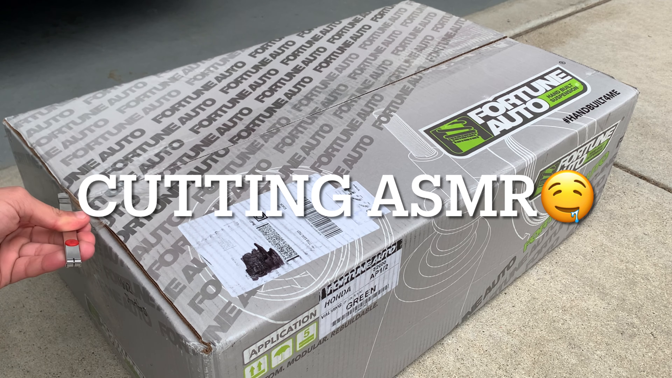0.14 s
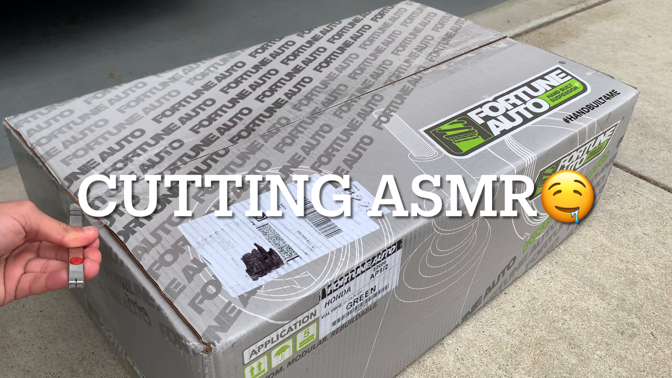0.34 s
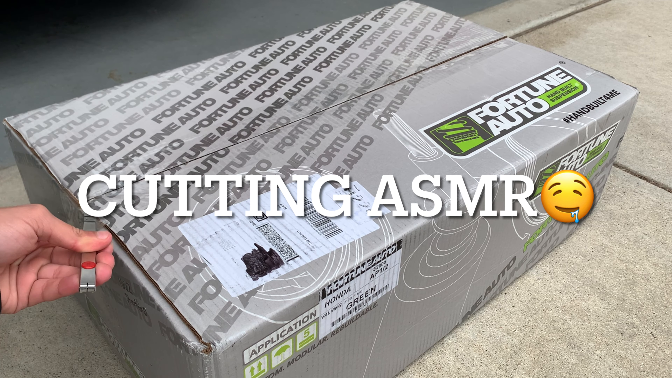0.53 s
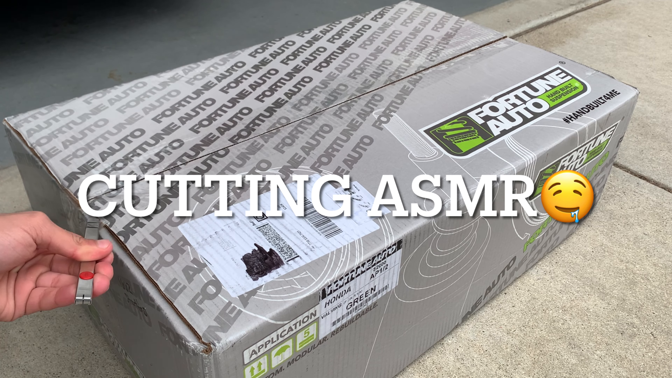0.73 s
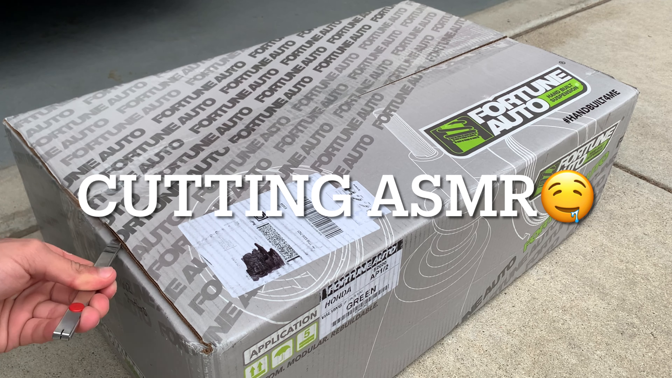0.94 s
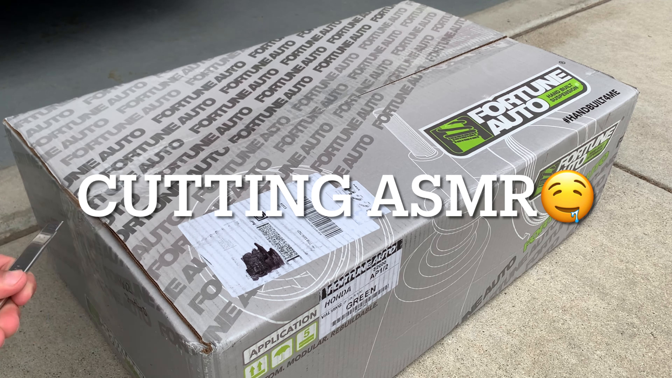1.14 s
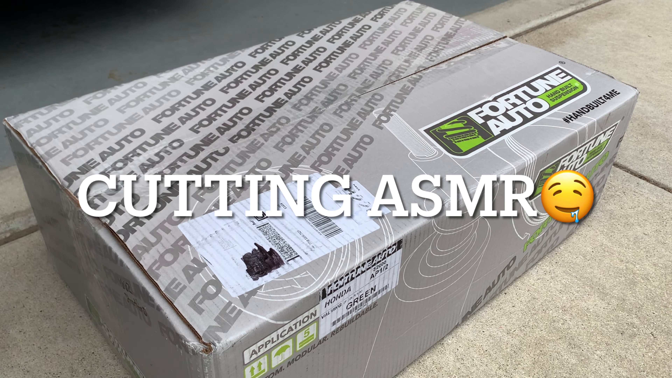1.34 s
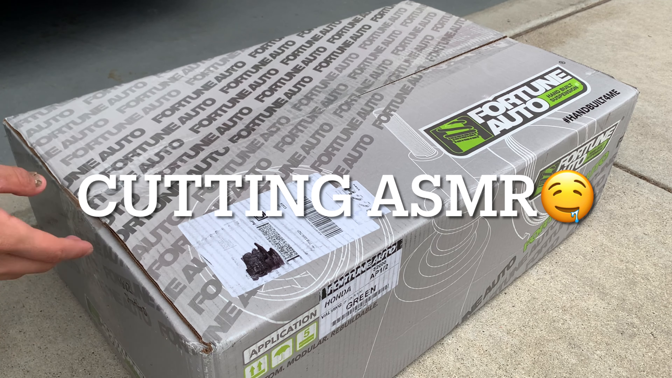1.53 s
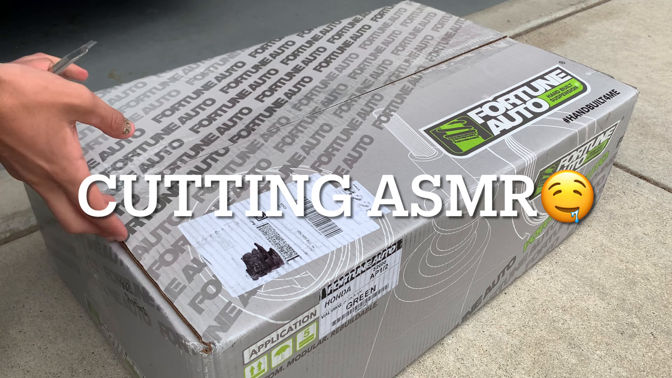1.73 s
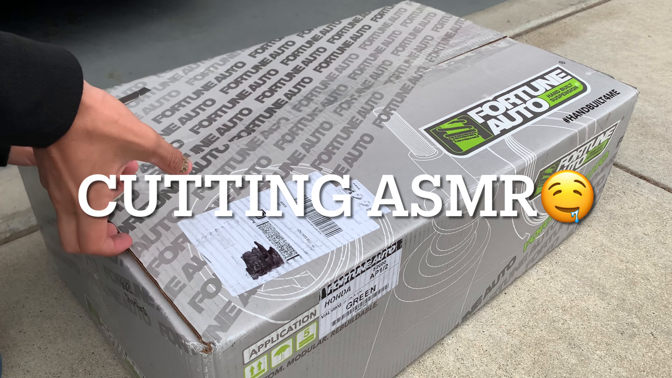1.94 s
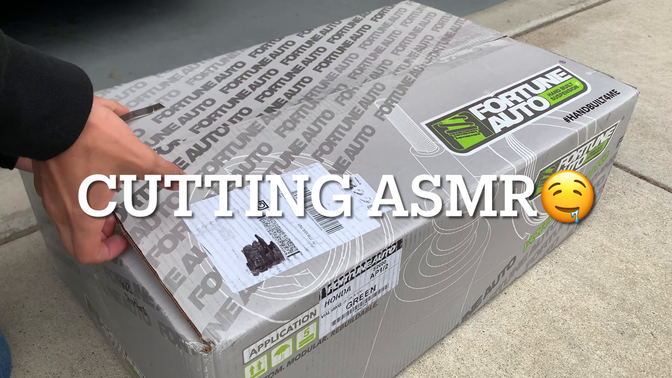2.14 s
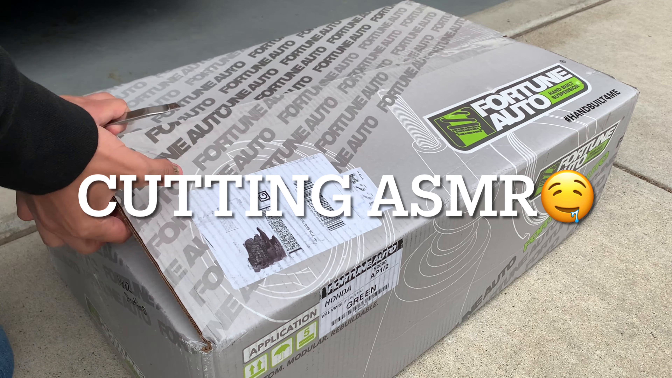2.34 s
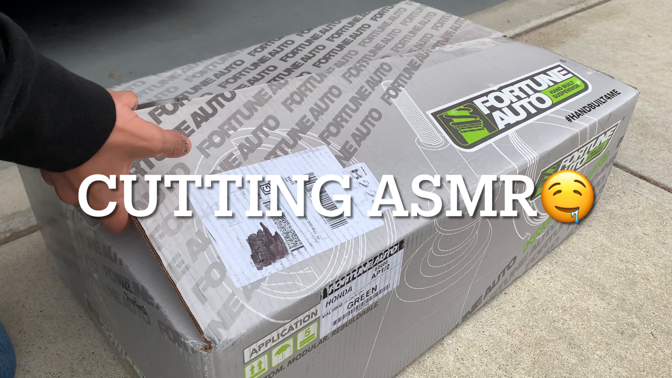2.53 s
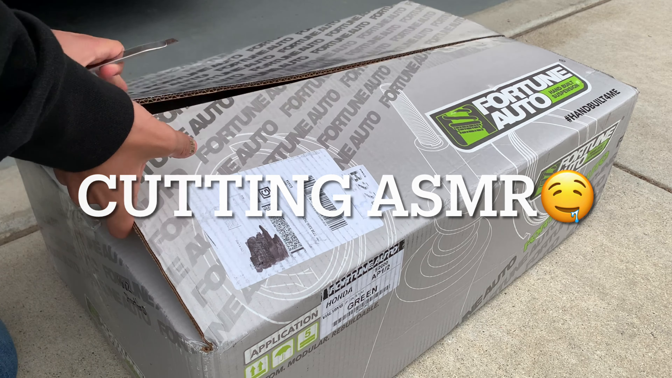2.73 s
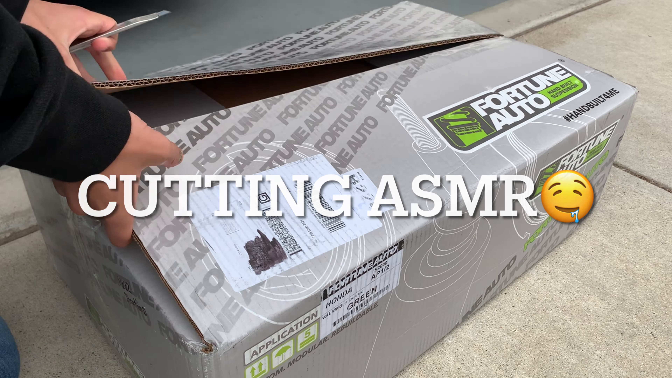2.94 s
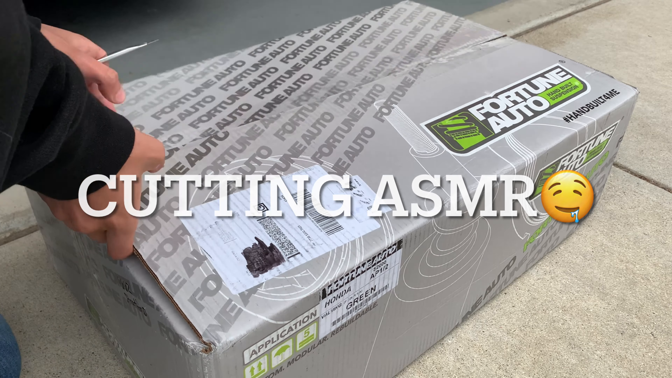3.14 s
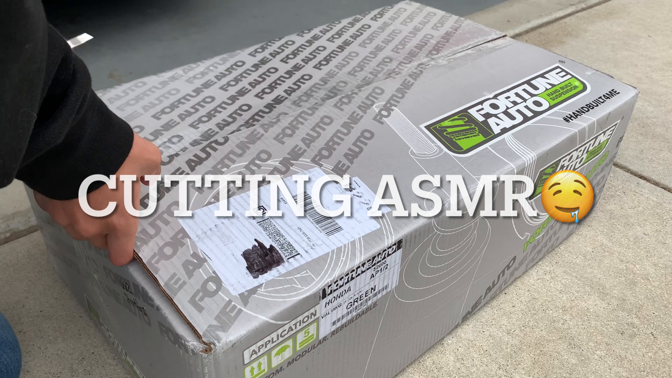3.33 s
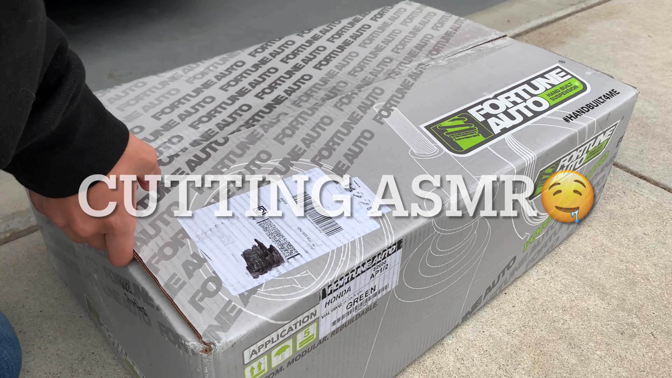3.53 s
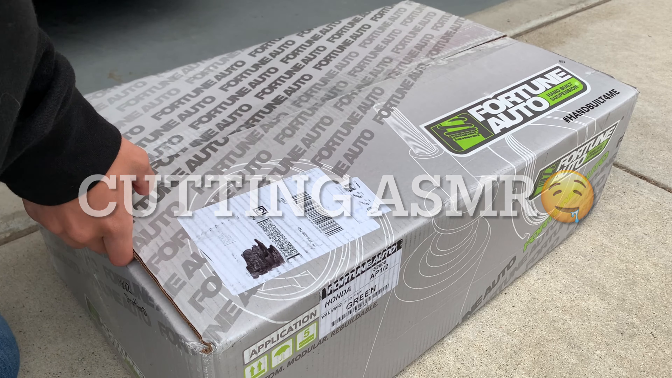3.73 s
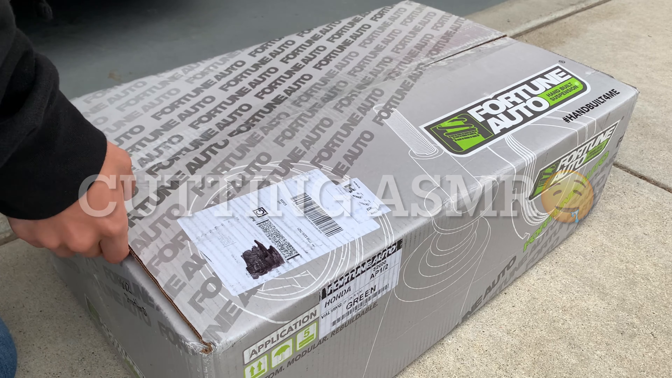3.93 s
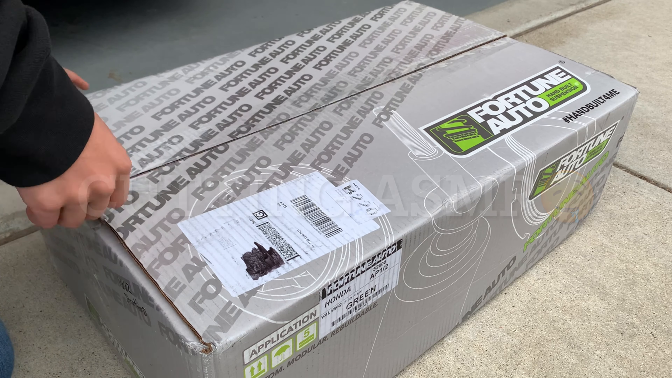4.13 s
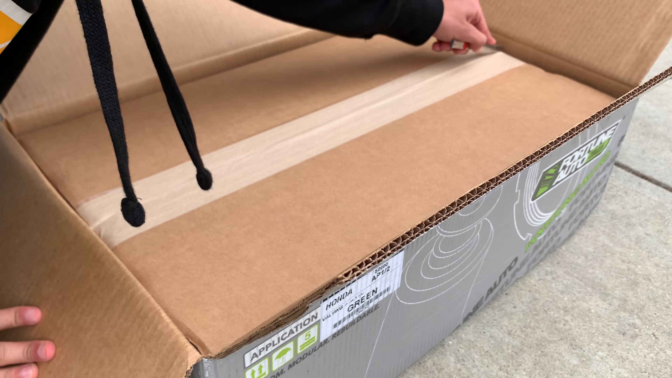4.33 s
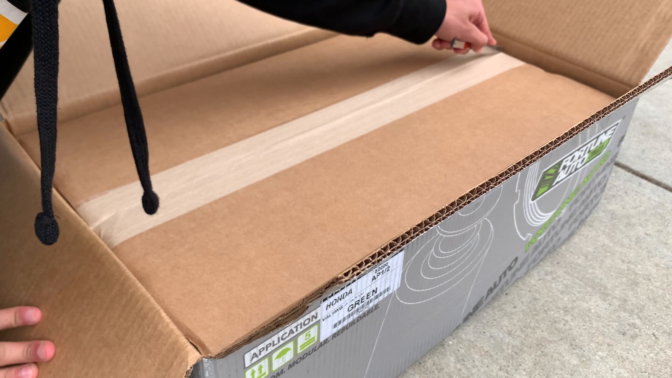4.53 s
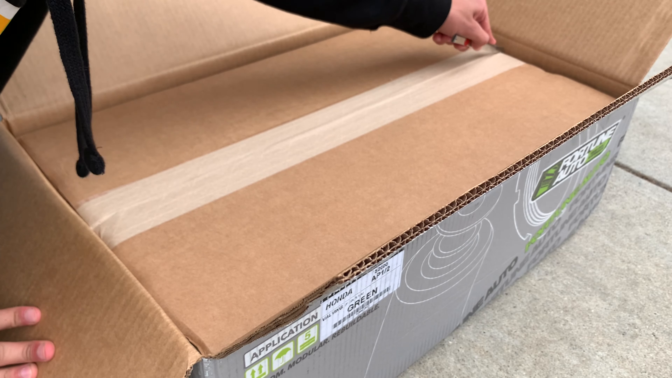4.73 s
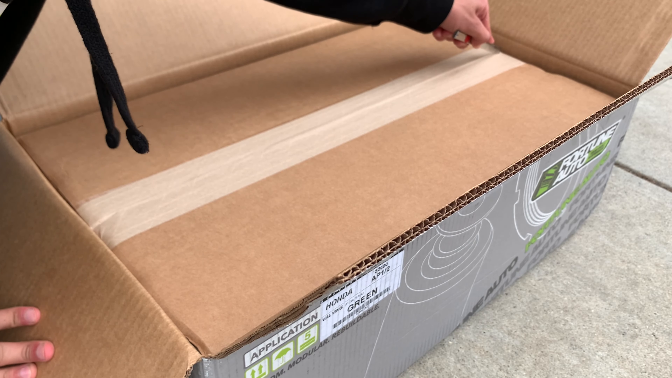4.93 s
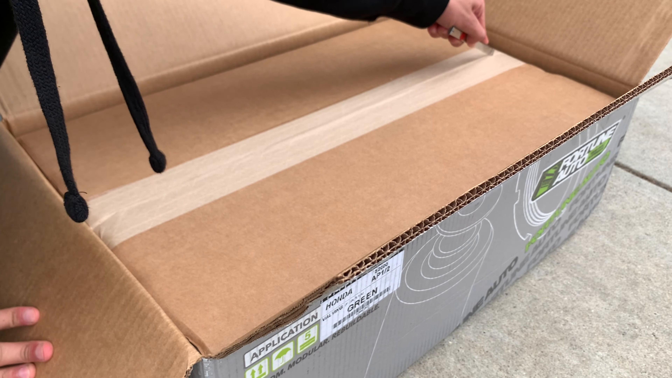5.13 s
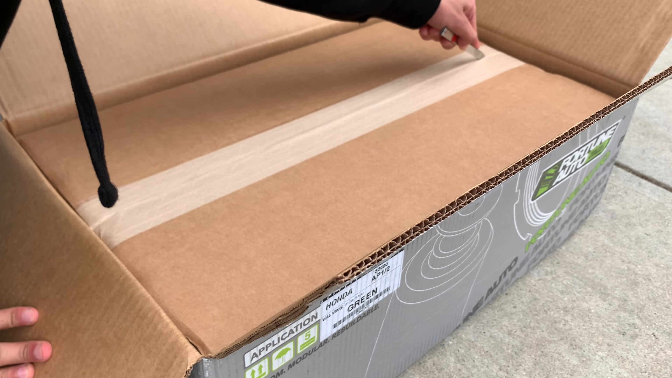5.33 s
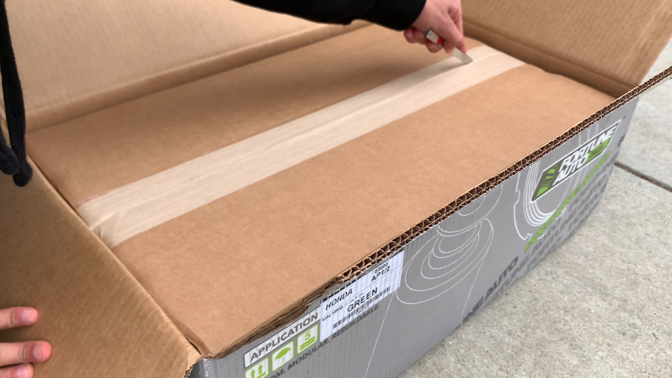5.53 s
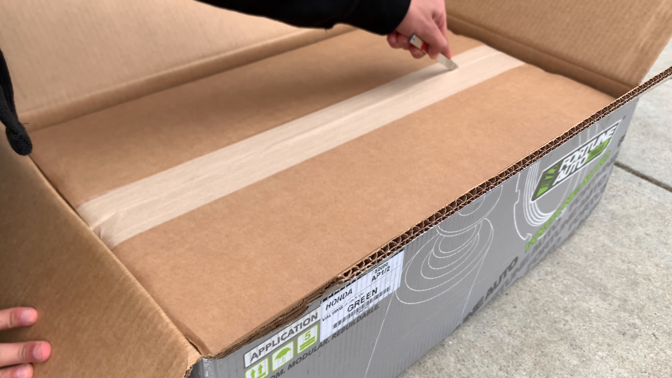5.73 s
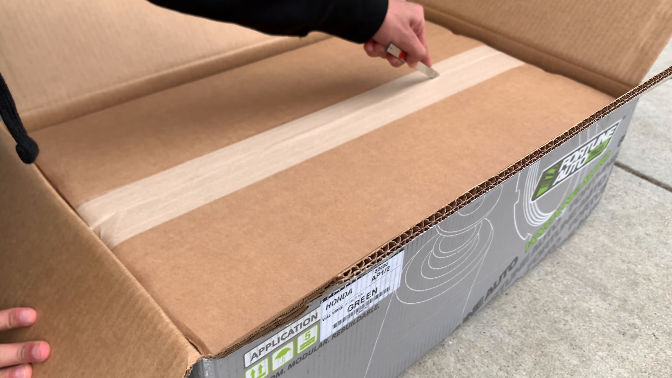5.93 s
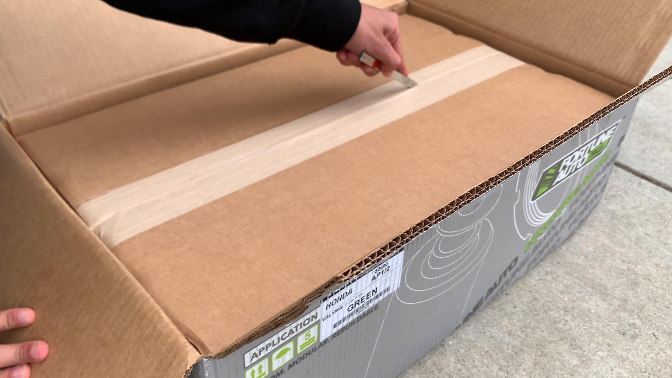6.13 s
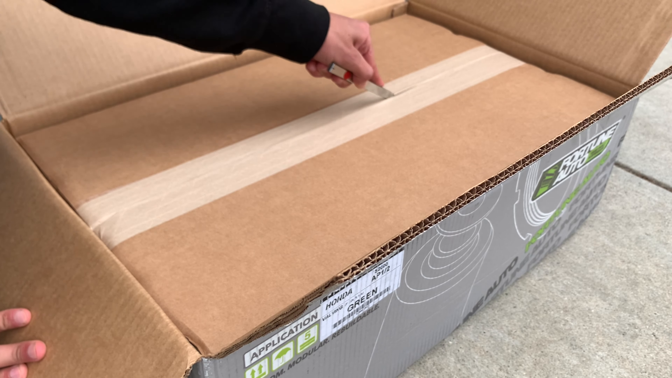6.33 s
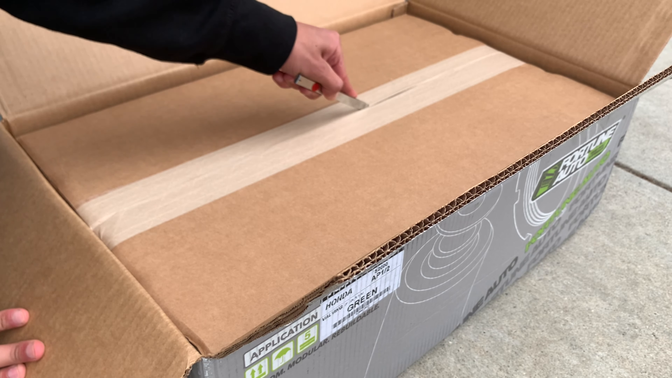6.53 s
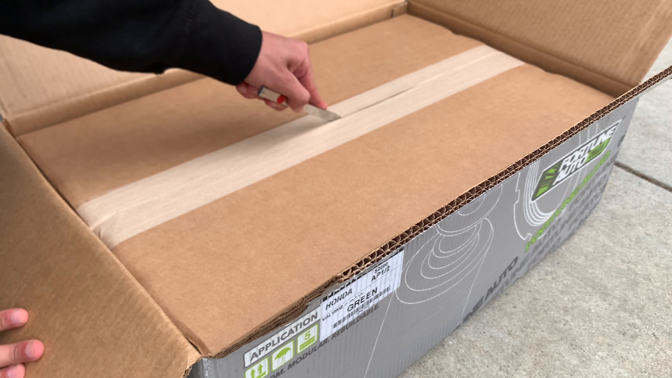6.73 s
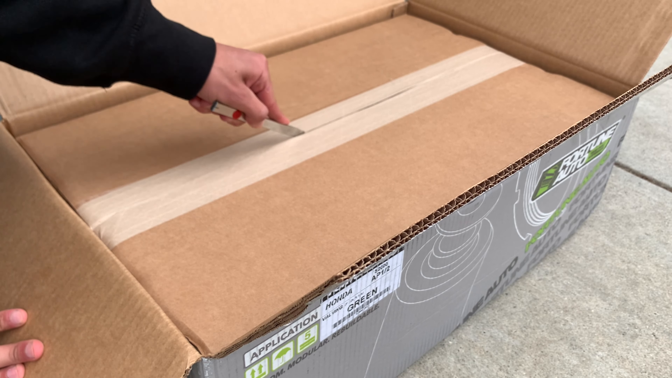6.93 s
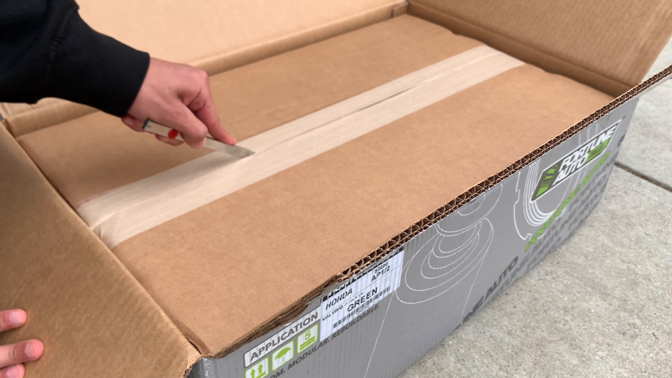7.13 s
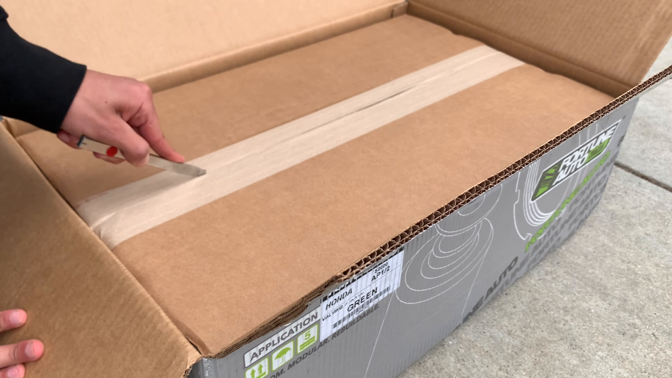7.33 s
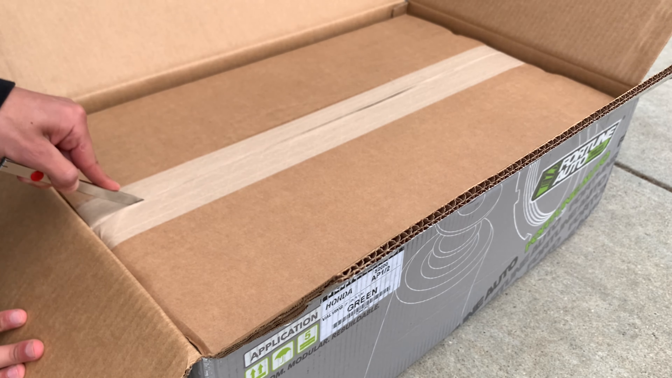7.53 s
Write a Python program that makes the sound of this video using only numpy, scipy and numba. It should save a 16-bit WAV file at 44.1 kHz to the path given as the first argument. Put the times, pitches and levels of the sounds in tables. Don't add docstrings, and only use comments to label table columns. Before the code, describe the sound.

A close, dry stereo pickup outdoors, with low distant traffic throughout. From 0.25 to 1.1 seconds a blade nicks the tape of a cardboard box: short hissy scrapes, bright clicks and dull knocks, strongest near 0.86. Quieter rubs and small crackles follow until 2. At 2.16 the tape snaps hard with a hollow knock; a flap bends with a falling chirp near 2.25, another heavy snap and scrape land at 2.48, then board crackles until 2.9. A sharp crack and deep thump hit at 3.1. After near quiet, a palm hisses over the lid from 3.87 to 4.3, growing duller. The sound dips at 4.34 as the scene changes. From 4.75 a blade slits inner tape, faint and raspy at first, with boxy bumps at 5.2, 6.12 and 6.24. It strengthens after 7, with a big drumlike thud at 7.09, shifting left, ending in rapid ticks around 7.6.

```python
import sys
import numpy as np
from scipy import signal
from scipy.fft import rfft, irfft, next_fast_len
from scipy.io import wavfile
from scipy.ndimage import uniform_filter1d, map_coordinates
from numba import njit

SR = 44100
rng = np.random.default_rng(int(sys.argv[2]) if len(sys.argv) > 2 else 0)


def ratio_of_db(decibels):
    return 10 ** (np.asarray(decibels, float) / 20)


def transcribe(u):
    v = np.clip(np.atleast_2d(u).T, -1, 1)
    q = np.round(v * 32767).astype(np.int16)
    wavfile.write(sys.argv[1], SR, q)


N = 338235
T = np.arange(N) / SR
F = np.fft.rfftfreq(next_fast_len(N), 1 / SR)


def unit(x):
    return x / np.sqrt(np.mean(x ** 2))


def shape(points):
    hz, db = np.transpose(points)
    return ratio_of_db(np.interp(np.log(F + 1), np.log(hz), db))


def colour(x, gain):
    return irfft(rfft(x, next_fast_len(N)) * gain, next_fast_len(N))[..., :N]


def peak(hz, width):
    return 1 / (1 + 1j * (F - hz ** 2 / (F + 1)) / width)


def walk(rate):
    k = int(SR / rate)
    held = np.repeat(rng.standard_normal(N // k + 1), k)
    return 2.07 * uniform_filter1d(uniform_filter1d(held, k), k)[:N]


def slips(rate, spread_db, bed, patchy_db):
    chance = rng.random((3, N))
    size = ratio_of_db(-spread_db * np.log(chance[1] + .03))
    clicks = (chance[0] < rate / SR) * size * np.sign(chance[2] - .5)
    return (unit(clicks) + bed * rng.standard_normal(N)) * ratio_of_db(patchy_db * walk(45))


@njit
def svf(x, hz, share):
    y, b, l = np.empty(len(x)), 0., 0.
    for i in range(len(x)):
        g = np.tan(np.pi * hz[i] / SR)
        v = (b + g * (x[i] - l)) / (1 + g * (g + share))
        b, l, y[i] = 2 * v - b, l + 2 * g * v, share * v
    return y


def twice(x, hz, share):
    return svf(svf(x, hz, share), hz, share)


def add(out, s, x):
    i = int(s * SR)
    out[i:i + len(x)] += x[:N - i]


def curve(rows):
    s, *columns = np.transpose(rows)
    return [np.interp(T, s, c) for c in columns]


# frequency in Hz, density in dB per Hz.
TRAFFIC = [(15, -54), (25, -21), (43, -12.5), (64, -5), (92, -11), (127, -3), (212, -18), (249, -20),
           (373, -23), (840, -23), (1520, -36), (2280, -48), (2610, -47.5), (14800, -58), (16000, -69)]
# frequency in Hz, likeness from 0 to 1.
ALIKE = [(60, 1), (200, 0.85), (500, 0.08), (1000, 0.068), (16000, 0.08)]


def traffic():
    hz, likeness = np.transpose(ALIKE)
    alike = np.interp(np.log(F + 1), np.log(hz), likeness)
    mid, side = rng.standard_normal((2, N))
    common, unlike = colour(mid, np.sqrt(1 + alike)), colour(side, np.sqrt(1 - alike))
    both = np.array([common + unlike, common - unlike])
    low = colour(both, shape(TRAFFIC) * (F < 300))
    high = colour(both, shape(TRAFFIC) * (F >= 300))
    swelling = low * ratio_of_db(1.2 * walk(7.4)) + high * ratio_of_db(0.17 * walk(4.1))
    return ratio_of_db(-52.5) * swelling / np.std(low + high)


def yard(x, t60, wet_db):
    t = T[:16384]
    scatter = rng.standard_normal((2, len(t))) * np.exp(-np.log(1000) * t / t60) * (t > .0012)
    scatter = irfft(np.exp(1j * np.angle(rfft(scatter))))
    scatter = scatter * np.clip(1 - t / t60, 0, 1)
    echoes = signal.fftconvolve(x[None], unit(scatter) / np.sqrt(len(t)), axes=1)[:, :N]
    return ratio_of_db(wet_db) * colour(echoes, F / (F + 250) / (1 + (F / 9100) ** 4))


def shifted(echoes):
    shift_s, shifts_per_s = 0.00015435, 5
    dull = colour(echoes, 1 / (1 + (F / 6500) ** 4))
    times = [np.arange(N) - shift_s * SR * walk(shifts_per_s) for _ in dull]
    return np.array([map_coordinates(side, [when], mode="mirror") for side, when in zip(dull, times)])


# frequency in Hz, gain in dB.
FIBRE = [(2000, 2), (3200, 1.5), (5000, 3), (7500, 3), (10000, 4), (13000, -0.5), (15600, -3),
         (17000, -54.5)]
# start in seconds, length in seconds, level in dB, first and last centre in Hz.
SLIDES = [
    (3.867, 0.15, -44, 8000, 4660),
    (4.023, 0.048, -55.5, 6400, 5940),
    (4.045, 0.261, -43, 6900, 2120),
]


def slides():
    hz, gain = np.full(N, 5000.), np.zeros(N)
    loudest, sag_db, width = 0.2, -32.5, 2.5
    for s, length, db, first_hz, last_hz in SLIDES:
        u = (T - s) / length
        on = (u >= 0) & (u < 1)
        hz[on] = first_hz * (last_hz / first_hz) ** u[on]
        rise = np.clip(0.088 + u / loudest, 0, 1)
        sag = ratio_of_db(sag_db * np.clip(u - loudest, 0, 1) * hz / 6000)
        gain += ratio_of_db(db) * rise * sag * on
    rub = colour(slips(6000, 1.5, 1.5, .9), shape(FIBRE))
    rub = rub + 0.82 * colour(rub, peak(4250, 1100))
    return uniform_filter1d(gain, 200) * unit(twice(rub, hz, width))


# start in seconds, length in seconds, hiss in dB,
# scrape in dB, change over the stroke in dB.
STROKES = [(0.249, 0.16, -53.5, -56, 12.5), (0.424, 0.023, -42.5, -41.5, 9.5), (0.603, 0.33, -57, -64, 15),
           (0.83, 0.071, -33.5, -44.5, 4), (0.942, 0.054, -53.5, -68, 6.5), (1.001, 0.034, -60, -42, -13.5),
           (1.365, 0.01, -70, -80, -13.5), (1.455, 0.043, -67, -67, 7.5), (1.384, 0.047, -63, -60, -7.5),
           (4.37, 0.039, -74.5, -81.5, -2), (1.606, 0.067, -69, -49, -11.5), (1.70, 0.2, -85, -62.5, -9),
           (1.906, 0.24, -62.5, -68.5, -4.5), (2.162, 0.073, -49, -34, -26.5),
           (2.259, 0.26, -50, -52, -31.5), (2.43, 0.042, -54, -73, 4), (2.479, 0.028, -42, -16.5, -27),
           (2.521, 0.26, -64, -53, -14), (2.724, 0.15, -64, -51.5, -4), (2.968, 0.16, -59, -59, 6),
           (3.097, 0.072, -50, -32.5, -29.5), (3.289, 0.039, -84, -55, -11.5),
           (3.703, 0.182, -73, -87.5, -6.5), (0.537, 0.127, -63, -88.5, 0.5), (0.792, 0.13, -66, -64.5, 3)]


def strokes():
    out, t = np.zeros((2, N)), T[:22050]
    attack_s, release_db_per_s = 0.02, 557.5
    for s, length, hiss_db, scrape_db, change_db in STROKES:
        db = change_db * np.clip(t / length, 0, 1) - release_db_per_s * np.clip(t - length, 0, 1)
        for row, top_db in zip(out, (hiss_db, scrape_db)):
            add(row, s, ratio_of_db(top_db + db) * np.clip(t / attack_s, 0, 1))
    return out


# centre in Hz, width in Hz, gain in dB.
LID = [(2650, 260, 4), (4750, 400, -0.5), (7000, 700, -2.5)]
# frequency in Hz, gain in dB.
SCRAPE = [(250, -8.5), (420, 2.5), (800, 7), (1300, -1.5), (2200, -5.5), (2800, -4.5), (3400, -29.5)]


def handling():
    hiss_gain, scrape_gain = strokes()
    lid = 1 + sum(ratio_of_db(db) * peak(hz, width) for hz, width, db in LID)
    hiss = unit(colour(slips(3500, 13.0, 1.2, 0.87), shape(FIBRE) * lid))
    air = colour(hiss, 1 / (1 + (12300 / (F + 1)) ** 16))
    hiss = hiss - air / (1 + hiss_gain / ratio_of_db(-55))
    scrape = unit(colour(slips(900, 4.1, 0.74, 5.4), shape(SCRAPE)))
    panel = unit(colour(slips(250, 0.83, 1.0, 0.82), peak(71, 39) + 0.19 * peak(170, 63)))
    grip = ratio_of_db(-68) * (T > 0) * (T < 6.3)
    load = uniform_filter1d(grip + ratio_of_db(1.5) * scrape_gain, int(0.062 * SR))
    return ratio_of_db(-3) * hiss_gain * hiss + ratio_of_db(-4) * scrape_gain * scrape + load * panel


# start in seconds, peak in dB.
FLEXES = [
    (2.252, -32),
    (2.283, -42),
]


def flexes():
    out, t = np.zeros(N), T[:4096]
    onset_hz, fall_s, length_s = 590, 0.0056, 0.057
    start_hz = onset_hz
    wave = np.sin(2 * np.pi * start_hz * fall_s * np.log(1 + t / fall_s))
    wave = wave * (1 - np.exp(-t / 0.0005)) * np.exp(-(t / length_s) ** 4)
    for s, db in FLEXES:
        add(out, s, ratio_of_db(db) * wave)
    return out


# multiple of the knock pitch, gain in dB.
PANEL = [(0.621, -3), (1.0, 4), (1.23, -4.5), (1.599, -4), (2.302, -8), (3.301, -6)]
# start in seconds, knock in dB, knock in Hz, thump in dB, thump in Hz.
OUTER = [(0.374, -34, 465, -30.5, 123), (0.44, -35, 318, -27.5, 138), (0.784, -33, 202, -32, 148),
         (.864, -23.5, 387, -27.5, 100), (0.887, -28.5, 229, -33, 70), (1.014, -35, 600, -35, 83),
         (1.61, -34, 272, -43.5, 140), (1.633, -38, 338, -40, 85.7), (2.027, -34.5, 200, -36, 89.4),
         (2.16, -21, 705, -34.5, 77), (2.166, -28.5, 537, -59, 120), (2.253, -37, 262, -53.5, 186),
         (2.286, -37.5, 700, -34.5, 100), (2.447, -38, 226, -26, 92), (2.478, -20.5, 790, -43.5, 117),
         (2.498, -21, 284, -26, 83), (2.741, -42.5, 560, -49, 141), (3.093, -24, 752, -34.5, 147),
         (3.109, -27, 353, -19.5, 69.4)]
# start in seconds, knock in dB, knock in Hz, thump in dB, thump in Hz.
INNER = [(4.755, -44.5, 248, -67, 57), (5.184, -35, 410, -32, 196), (5.205, -28, 503, -35, 130),
         (6.124, -21.5, 290, -24, 210), (6.214, -32.5, 372, -44, 145), (6.238, -19, 223, -21.5, 113),
         (6.547, -29, 191, -32, 81), (6.627, -25.5, 250, -27, 133), (6.778, -37, 255, -23.5, 108),
         (6.999, -30, 272, -53, 142), (7.086, -22, 564, -31, 130), (7.088, -40, 705, -11.5, 229.4),
         (7.388, -28, 187, -29, 85)]


def knocks():
    out, crunch, t = np.zeros(N), np.zeros(N), T[:16384]
    for s, db, hz, thump_db, thump_hz in OUTER + INNER:
        t60 = 0.055 * (300 / hz) ** 0.16
        fall = np.log(1000) / t60
        modes = np.zeros(len(t))
        for multiple, mode_db in PANEL:
            ring = np.sin(2 * np.pi * (multiple * hz * t + rng.random()))
            modes += ratio_of_db(mode_db) * ring * np.exp(-1.5 * np.sqrt(multiple) * fall * t)
        turns = thump_hz * (t + 0.21 * 0.017 * (1 - np.exp(-t / 0.0036)))
        thump_fall = .7 * np.log(1000) / 0.07 * (thump_hz / 100) ** 0.65
        thump = np.sin(2 * np.pi * turns) * np.exp(-thump_fall * t) * (1 - np.exp(-t / 0.005)) ** 2
        add(out, s, ratio_of_db(db - 2.5) * modes * (1 - np.exp(-t / 0.002)) + ratio_of_db(thump_db + 3.5) * thump)
        crush = rng.standard_normal(len(t)) * np.exp(-1.2 * fall * t) * (1 - np.exp(-t / 0.0014))
        add(crunch, s, ratio_of_db(db) * crush)
    return out + 0.32 * colour(crunch, shape(SCRAPE))


# start in seconds, peak in dB, pitch in Hz.
CRACKLES = [(.266, -49, 2090), (.376, -30.5, 1170), (.735, -49, 2500), (.745, -53, 2600), (.77, -48, 4700),
            (0.779, -41, 2500), (0.789, -48, 2600), (.86, -40, 2500), (.875, -38, 2580), (.89, -33, 977),
            (1.018, -42.5, 1000), (.805, -51, 3000), (.82, -50, 4520), (1.41, -59, 2800), (1.44, -55, 2560),
            (1.476, -58, 2900), (1.488, -50, 2680), (1.501, -49, 2750), (1.615, -45.5, 1170),
            (1.631, -46.5, 1540), (2.172, -36, 2200), (2.185, -38, 1490), (2.492, -44, 1910),
            (2.506, -35.5, 2500), (2.606, -53, 898), (2.615, -51, 1200), (2.653, -44, 1310),
            (2.710, -50, 900), (2.715, -42.5, 1500), (2.737, -46, 1100), (2.744, -40, 2600),
            (2.753, -46, 700), (2.761, -48, 950), (2.772, -42, 1300), (2.786, -45, 1100),
            (2.792, -44, 1300), (2.804, -46, 1090), (2.830, -38, 1240), (2.841, -54, 800),
            (2.851, -50, 1810), (2.871, -51, 700), (3.103, -30, 2400), (3.108, -23.5, 2660),
            (3.112, -33.5, 2060), (3.12, -43, 2470), (3.128, -45, 1800), (3.31, -51, 1200),
            (3.394, -56, 2000), (4.508, -60.5, 2400)]


def crackles():
    out, t = np.zeros(N), T[:1024]
    for s, db, hz in CRACKLES:
        puff = rng.standard_normal(len(t)) * np.exp(-t * hz / 3.8) * (1 - np.exp(-t * hz / 1.1))
        pop = twice(puff, hz + 0 * t, 0.52)
        add(out, s, ratio_of_db(db - 2.0) * pop / abs(pop).max())
    return out


# break in seconds, peak in dB, centre in Hz, dull part in dB.
NICKS = [(0.263, -47, 4420, 5), (.31, -41, 6300, -23), (0.325, -32.5, 4220, -8), (0.3731, -31, 4940, 10.5),
         (0.4318, -27, 7330, -3), (0.4503, -22, 7440, -9), (0.609, -42.5, 11400, -14),
         (0.732, -36, 6870, -16), (0.773, -33.5, 7000, -15), (0.852, -24, 11700, -20),
         (0.862, -16.5, 7800, -20), (0.966, -39, 8000, -6), (1.0155, -20.5, 6400, -15),
         (1.024, -32, 5140, 9), (1.0864, -48, 9850, -19), (1.3688, -35, 6600, -26),
         (1.485, -50.5, 10000, -2), (1.613, -40.5, 4500, -8), (1.622, -45.5, 10100, 3),
         (1.637, -46.5, 10500, -21.5), (1.936, -45, 10800, -15.5), (1.967, -42, 7500, -26),
         (2.027, -42, 3860, -6)]
# break in seconds, peak in dB, centre in Hz, dull part in dB.
PULLS = [(2.161, -34, 5400, -20), (2.2497, -31.5, 6100, -8), (2.283, -34, 4370, -14),
         (2.2978, -32, 6060, -8), (2.337, -41, 5130, -25), (2.399, -43.5, 9900, 2),
         (2.4482, -34.5, 7000, 7), (2.4792, -20.5, 3920, -1), (2.593, -42, 4970, 13),
         (2.744, -54, 4200, -1), (2.83, -45.5, 6100, 9), (2.888, -53, 11100, -13),
         (2.9817, -45.5, 6900, -13), (3.0923, -21, 5070, -15), (3.8715, -42, 4900, -30),
         (4.0608, -25, 5600, -44), (4.0681, -20.5, 6030, -49)]
# break in seconds, peak in dB, centre in Hz, dull part in dB.
THREADS = [(4.756, -38.5, 9850, 4.5), (4.778, -49, 3830, -1), (4.8524, -35.5, 4760, -12),
           (4.8738, -45.5, 4230, 5), (5.0186, -40.5, 4940, 6), (4.9747, -45, 5100, -4),
           (5.1156, -39, 4900, -7), (5.1712, -37, 6500, -13), (5.186, -30.5, 6400, 1),
           (5.2002, -26.5, 6300, 1), (5.208, -32, 6400, 0), (5.322, -49, 6500, -15),
           (5.385, -46, 6600, -15), (5.5016, -41, 6500, -10), (5.698, -34, 6500, -26),
           (6.1242, -24.5, 6000, 3), (6.179, -35, 6460, 5), (6.2107, -52, 4050, -5),
           (6.237, -23, 6350, -3.5), (6.552, -29, 10300, -29), (7.089, -22, 8500, 3.5),
           (7.366, -24.5, 3920, -8), (7.398, -21, 3840, -0.5), (7.405, -25, 10000, -20),
           (7.407, -32, 6000, -15)]
# break in seconds, peak in dB, centre in Hz, dull part in dB.
TICKS = [(0.855, -35, 4740, -10), (0.865, -14, 6990, -8), (0.958, -35, 7500, -3), (.3735, -34, 8900, -10),
         (1.910, -52, 4500, -18), (1.932, -47, 5000, -12), (1.98, -49, 7000, -20),
         (2.156, -12.5, 9500, -36), (2.162, -15, 5130, -28), (2.164, -19, 6200, -24),
         (2.4799, -17, 7000, -9), (4.117, -32, 6000, -25), (4.385, -57, 4500, -8),
         (6.963, -29.5, 11400, -15), (6.968, -36, 11200, -8), (7, -31, 11000, 0), (7.0154, -27, 10900, -23),
         (7.3244, -36, 4900, -15), (7.3876, -26, 6900, -26), (7.4455, -41, 6800, -15),
         (7.6035, -24, 7100, -18), (7.608, -22.5, 6300, 3), (7.619, -28, 6500, -25),
         (7.6239, -27, 10400, -27), (7.641, -22.5, 10700, -25), (7.6539, -23.5, 10500, -18)]
SNAP_MS = (6.4, 3.1, 6.2, 1.2)
SNAP_MS_PER_DB = (0.36, 0.44, 0.28, 0.016)


def snaps():
    lead_s = .012
    bright, dull, t = np.zeros(N), np.zeros(N), T[:2048] - lead_s
    for rows, base_ms, ms_per_db in zip((NICKS, PULLS, THREADS, TICKS), SNAP_MS, SNAP_MS_PER_DB):
        for s, db, hz, dull_db in rows:
            ms = base_ms + ms_per_db * (db + 42)
            fall = np.exp(-t / (max(ms, .2) * 1e-3 / 3))
            swell_in = 0.042 * np.exp(t / 0.0022) + np.exp(t / (0.00028 + 0.00005 * max(ms, 0)))
            burst = rng.standard_normal(len(t)) * np.where(t < 0, swell_in, fall) * np.sqrt(1.66 / base_ms)
            burst[int(lead_s * SR) + 1] += 1.0
            broad, tuned = svf(burst, hz + 0 * t, 2.2), svf(burst, hz + 0 * t, 0.38)
            add(bright, s - lead_s, ratio_of_db(db) * (0.68 * broad + 0.85 * tuned))
            add(dull, s - lead_s, ratio_of_db(db + dull_db) * burst)
    bright = colour(bright, shape(FIBRE) * F ** 2 / (F ** 2 + 1800 ** 2))
    return 0.99 * bright + 1.8 * colour(dull, peak(2400, 3000) ** 2)


GRAIN_HZ = (2500, 4200, 6500, 10500, 14500)


def flicker(x):
    parts = np.interp(np.log(F + 1), np.log(GRAIN_HZ), np.arange(len(GRAIN_HZ)))
    out = np.zeros(N)
    for k in range(len(GRAIN_HZ)):
        swell = ratio_of_db(.7 * (walk(10) + walk(35)))
        out += swell * colour(x, np.clip(1 - abs(parts - k), 0, 1))
    return out


# time in seconds, speed as hiss in dB, pressure as drum in dB,
# flap tension as drum in Hz.
SLIT = [(4.8, -68, -45.5, 179), (4.96, -61, -62, 197), (5.2, -63, -53.5, 228), (5.5, -60, -49.5, 225),
        (5.72, -57.5, -48.5, 293), (5.96, -53, -41, 322), (6.18, -54.5, -37.5, 324), (6.32, -54, -47, 221),
        (6.55, -53, -39, 216), (6.82, -52, -43.5, 210), (7.06, -52, -34, 237), (7.11, -44, -36, 237),
        (7.33, -49.5, -41, 236), (7.4, -44.5, -41.5, 268), (7.5, -42, -32, 274), (7.59, -45, -40.5, 293),
        (7.67, -60, -38.5, 356)]
# time in seconds, ring in Hz, ring in dB.
RING = [(4.8, 1700, -66), (5.05, 1750, -63), (5.3, 1760, -58), (5.55, 1810, -55), (6.02, 1715, -63),
        (6.2, 1880, -99), (6.75, 2920, -68), (7.0, 2630, -50.5), (7.3, 2710, -56), (7.42, 2700, -63),
        (7.67, 2650, -52)]
# time in seconds, pitch in Hz, scrape in dB.
SPAN = [(4.9, 445, -86), (5.02, 428, -55), (5.15, 445, -70), (5.3, 437, -55.5), (5.6, 450, -56.5),
        (5.8, 514, -58.5), (6.0, 590, -69), (6.17, 840, -41), (6.3, 780, -90), (6.55, 540, -52),
        (6.8, 740, -75), (7.05, 696, -47.5), (7.28, 714, -56), (7.4, 690, -44.5), (7.55, 500, -43.5),
        (7.67, 610, -60.5)]
# centre in Hz, width in Hz, gain in dB.
BLADE = [(2400, 490, 4), (4050, 1100, -1), (4780, 270, -2.5), (6510, 580, -4.5), (10100, 360, -15),
         (8000, 260, -30)]


def slit():
    hiss_db, drum_db, drum_hz = curve(SLIT)
    ring_hz, ring_db = curve(RING)
    span_hz, scrape_db = curve(SPAN)
    drag = slips(3000, 3.2, .6, 1.0)
    steel = 1 + sum(ratio_of_db(db) * peak(hz, width) for hz, width, db in BLADE)
    hiss = unit(flicker(colour(drag, shape(FIBRE) * steel)))
    ring_hz = ring_hz * (1 + 0.005 * walk(25))
    ring = unit(svf(svf(drag, ring_hz, .12), ring_hz, .24))
    ring = ring + 0.17 * unit(colour(drag, peak(2340, 1200) ** 2))
    shake = slips(1500, 2.96, 1.0, 1.16)
    scrape = unit(twice(shake, span_hz, 0.26))
    flap = unit(colour(slips(1600, 2.9, 1.0, 4.3), peak(950, 130)))
    drum = unit(svf(shake, drum_hz, 0.21)) + 0.94 * unit(colour(shake, peak(115, 39)))
    cut = ratio_of_db(hiss_db + 2.5) * hiss + ratio_of_db(ring_db + 2.5) * ring + ratio_of_db(scrape_db) * scrape
    cut = cut + ratio_of_db(drum_db - 5) * drum + ratio_of_db(-30.5 + 0.65 * drum_db) * flap
    return cut * np.interp(T, (4.745, 5.09), (0, 1))


# time in seconds, lead of the left in samples, left minus right in dB.
PATH = [
    (0, 11, 3),
    (2.0, 8.5, 2.5),
    (4.33, 9.3, 1.5),
    (4.34, 1.54, -4.5),
    (6.1, 1.2, 2),
    (6.5, 5.5, 0),
    (7.05, 6.6, 4),
    (7.67, 8.9, 3),
]


def place(x):
    lag, pan_db = curve(PATH)
    late = map_coordinates(x, [np.arange(N) - lag], mode="mirror")
    return np.array([x * ratio_of_db(pan_db / 2), late * ratio_of_db(-pan_db / 2)])


def scene():
    pops, cut = crackles(), slit()
    sharp, blows = snaps() + pops, knocks() + flexes()
    drags = handling() + slides()
    direct = place(sharp + blows + drags + cut) + ratio_of_db(-4.5) * pops
    ground = shifted(yard(drags + blows + ratio_of_db(-1.5) * sharp + ratio_of_db(-6) * cut, 0.011, -1.3))
    walls = yard(sharp + blows + ratio_of_db(1.0) * cut, 0.12, -4.0)
    change_s, fade_out_s, fade_in_s = 4.337, .035, .04
    fade = np.where(T < change_s, (change_s - T) / fade_out_s, (T - change_s) / fade_in_s)
    return (direct + ground + walls + traffic()) * np.clip(fade, .03, 1)


def band_limit(x):
    return signal.sosfilt(signal.butter(12, 16820, fs=SR, output="sos"), x)


# frequency in Hz, gain in dB.
MIC = [(30, -9.5), (60, 0), (15000, -3.5), (15900, -3.5), (16400, -11), (17200, -46.5)]
# frequency in Hz, left minus right in dB.
SKEW = [(30, -5.5), (125, -2), (500, 0), (1000, 1.8), (2000, -1.1), (4000, -4.5), (8000, 5.5)]


def record(dry):
    port_hz, turn_hz, zero_hz = 6300, 4780, 6200
    share = .96 / (1 + (port_hz / (F + 1)) ** 16)
    skew = shape(SKEW) ** .5
    left, right = rfft(dry, next_fast_len(N)) * shape(MIC) * [skew, 1 / skew]
    turned = left * np.exp(2j * np.pi * (F - zero_hz) / turn_hz)
    right = np.sqrt(1 - share ** 2) * right + share * turned
    mix = irfft([left, right], next_fast_len(N))[:, :N]
    return band_limit(mix)


dry = scene()
out = record(dry)
transcribe(out)
```